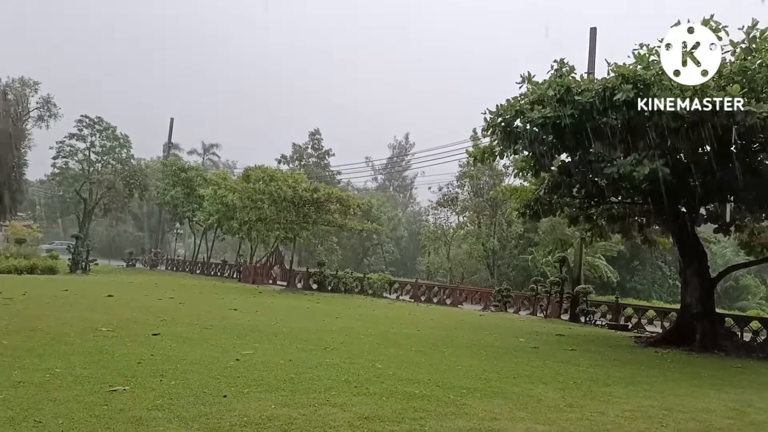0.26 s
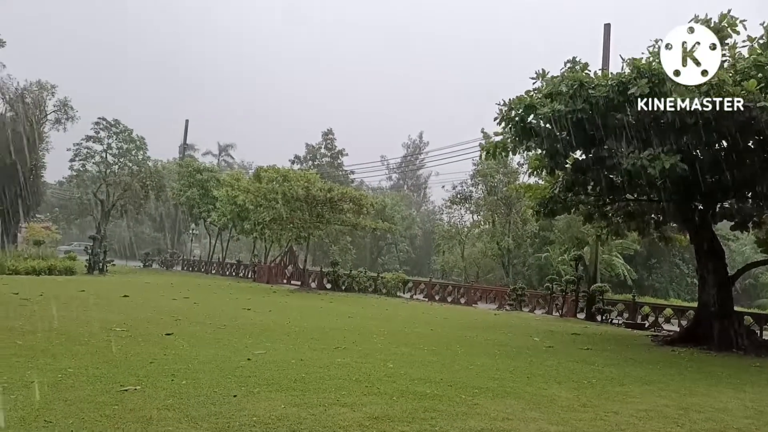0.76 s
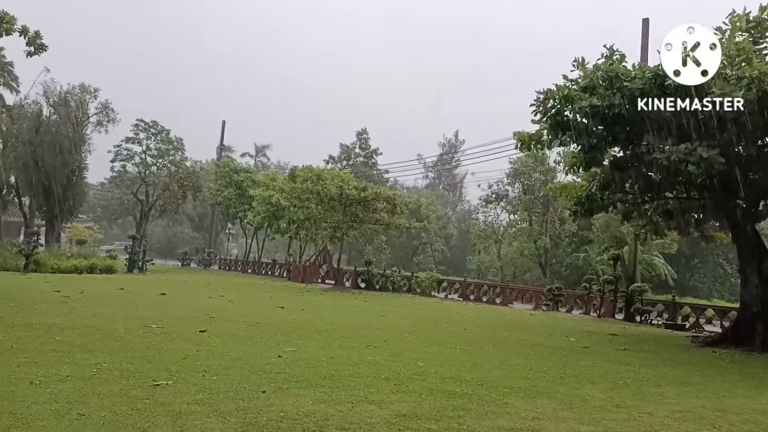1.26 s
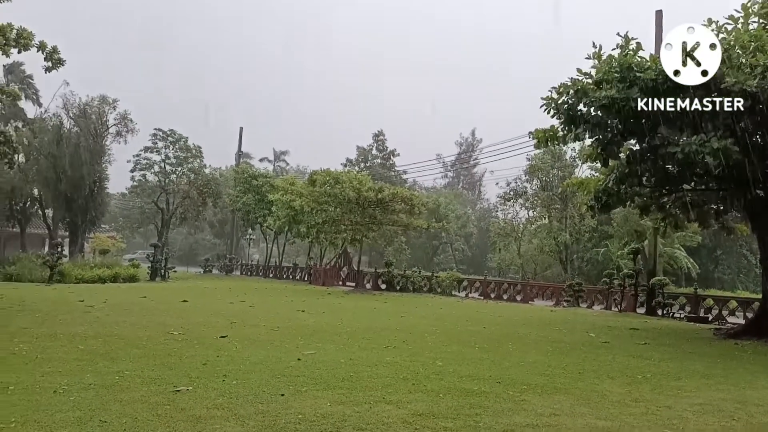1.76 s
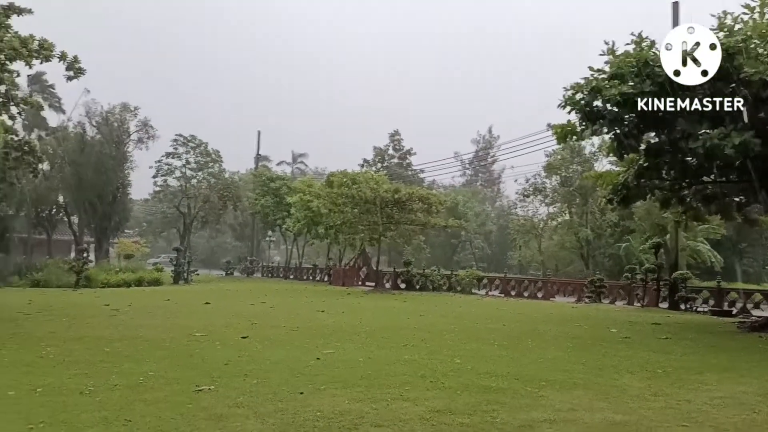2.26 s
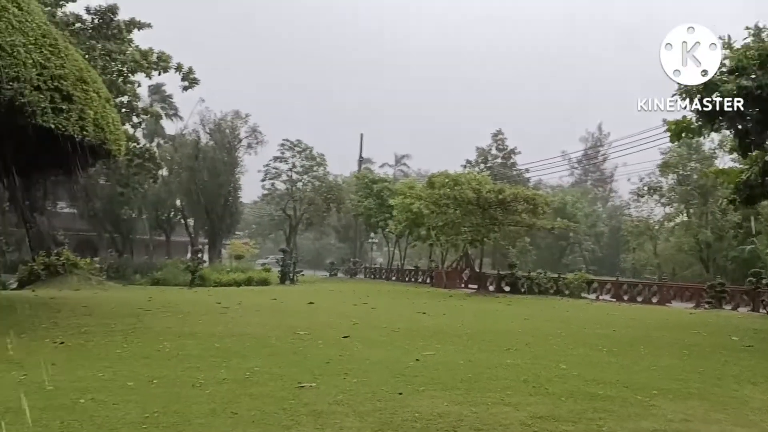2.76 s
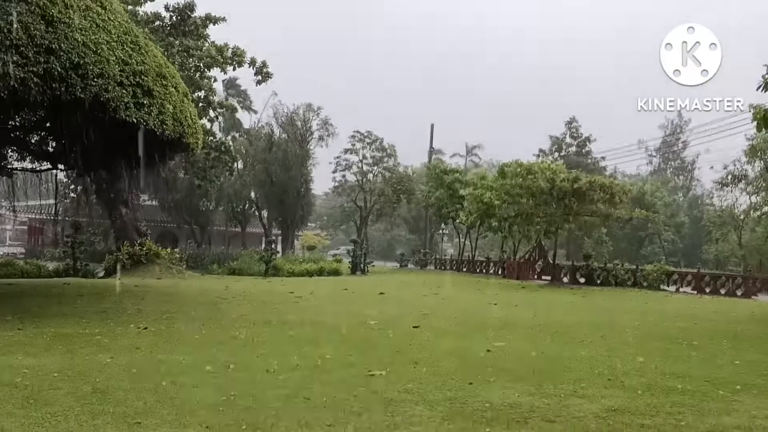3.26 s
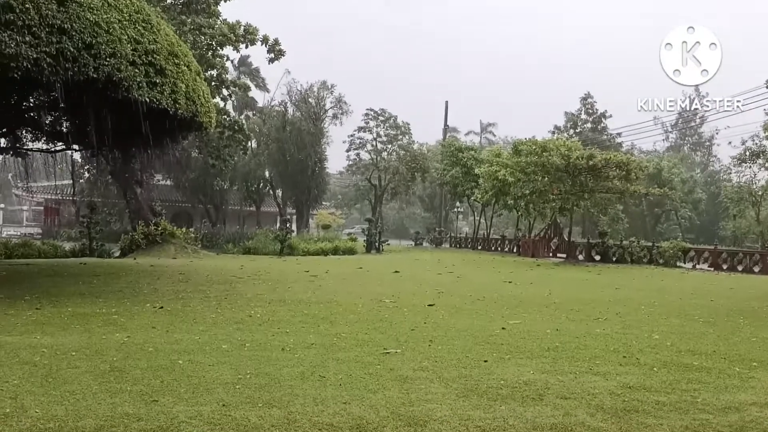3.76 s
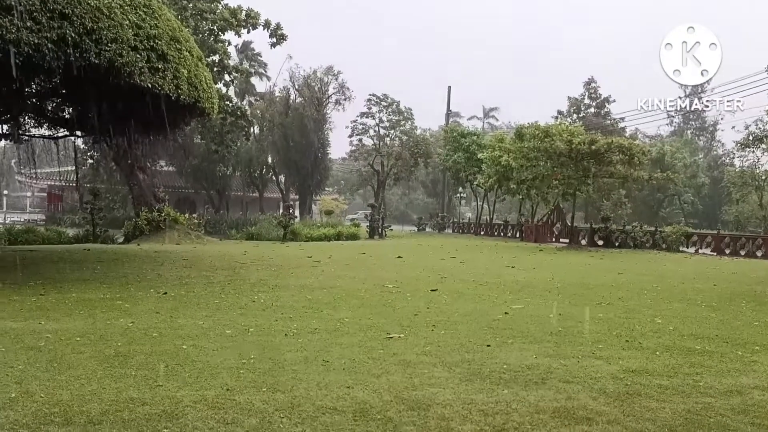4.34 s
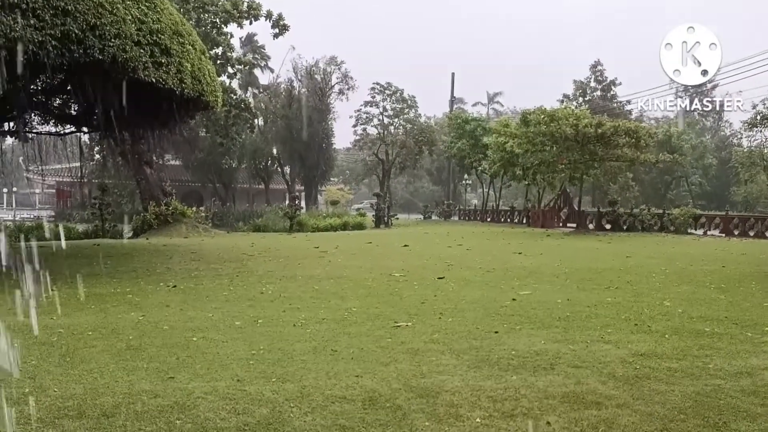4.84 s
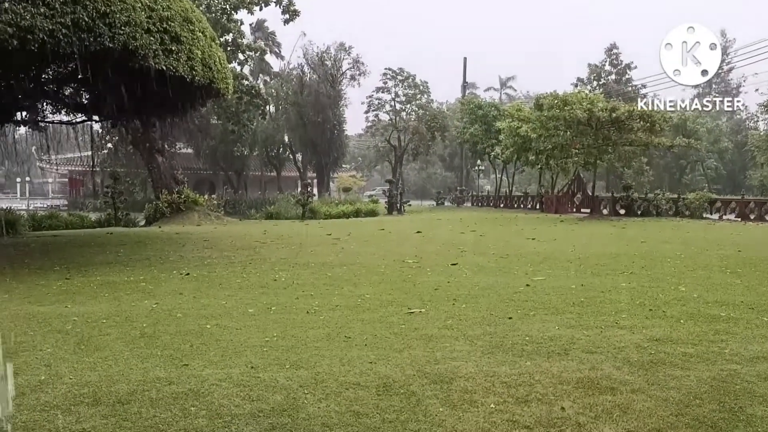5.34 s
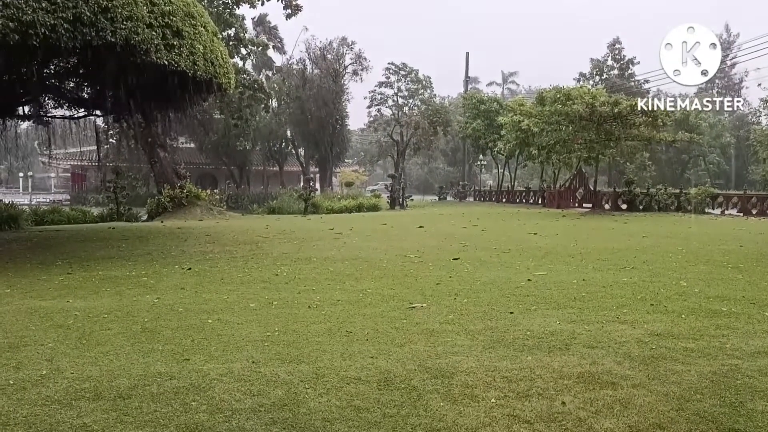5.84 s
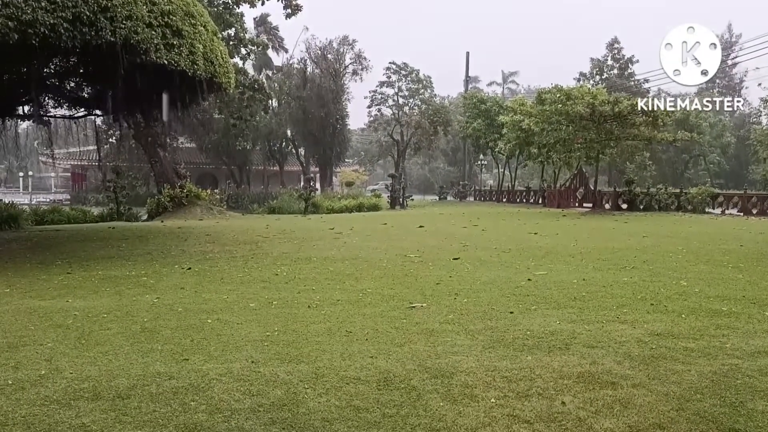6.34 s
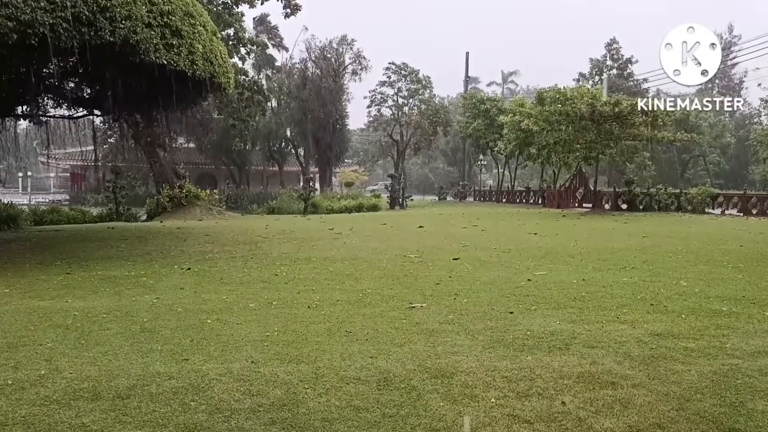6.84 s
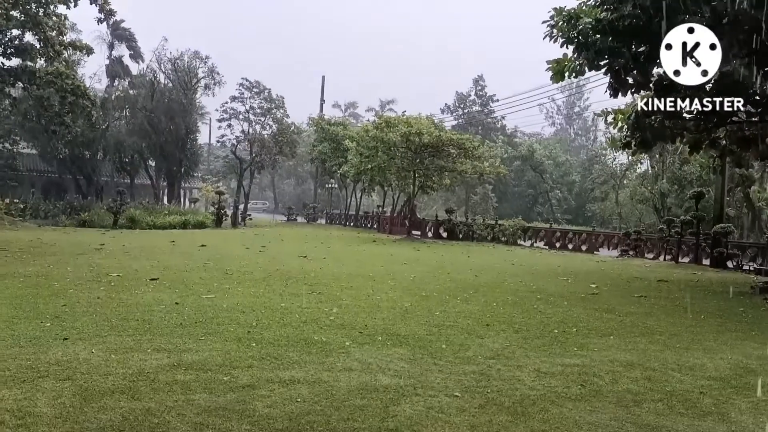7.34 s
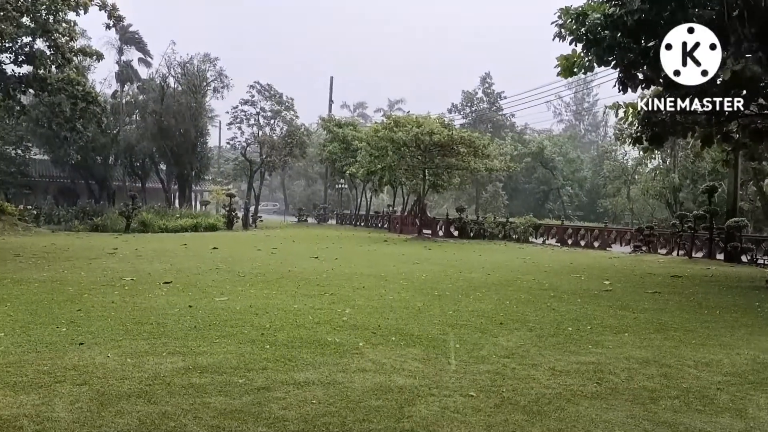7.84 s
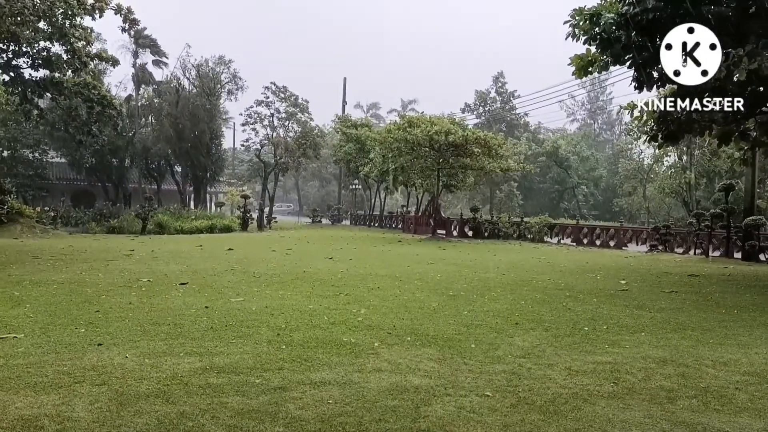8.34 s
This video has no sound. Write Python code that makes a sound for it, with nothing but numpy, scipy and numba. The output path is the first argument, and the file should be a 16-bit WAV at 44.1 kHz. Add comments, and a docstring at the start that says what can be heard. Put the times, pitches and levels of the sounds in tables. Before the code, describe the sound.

Heavy rain pours steadily on a lawn and leafy trees, a dense bright hiss with crisp close drops ticking and a few faint low thumps.

```python
"""Heavy rain on lawn and trees

A downpour on a lawn and tree crowns, taken with a hand-held phone that has two microphone ports.
Far rain is noise partly shared by the ports, thickened by thousands of small decaying rings.
Near drops are louder rings with bright noise spray and quick echoes. The low edge of the hiss opens
and closes band by band, and short narrow noise bursts fill in there; behind it lie a dark noise
floor, a wavering hum, and a few soft thumps made from rough low tones, mostly at one port.
"""
import sys
import numpy as np
from scipy import signal
from scipy.fft import rfft, irfft, next_fast_len
from scipy.io import wavfile
from scipy.ndimage import uniform_filter1d, map_coordinates
from numba import njit

SR = 44100
rng = np.random.default_rng(int(sys.argv[2]) if len(sys.argv) > 2 else 0)


def materialize(psi):
    """Save the field psi as 16-bit PCM at rate SR to the path in sys.argv[1].

    A 1-D psi becomes a single channel; in a 2-D psi each row is a channel.
    """
    bounded = np.clip(np.atleast_2d(psi).T, -1, 1)
    quanta = np.round(bounded * 32767).astype(np.int16)
    wavfile.write(sys.argv[1], SR, quanta)


N = 380583
T = np.arange(N) / SR
SIZE = next_fast_len(N)
HZ = np.arange(SIZE // 2 + 1) * SR / SIZE

# Course of the downpour: t/s, body 1.7-4 kHz level/dB, treble above 4 kHz against the body/dB
SURGE = [(0, -51, 6), (.65, -49.5, 5), (1.6, -52.5, 7.5), (2.25, -49.5, 5), (3.0, -52.5, 8.5),
         (3.7, -49.5, 4), (4.4, -49, 5.5), (5.3, -49.5, 5), (6.0, -50, 5), (6.9, -48, 3.5), (7.3, -51, 3.5),
         (7.5, -47.5, 3), (7.75, -46.5, 2), (8.12, -50.5, 6), (8.3, -49, 4.5), (8.63, -47, 3.5)]
# Flurries of drops close by, and lulls (negative): t/s, length/s, body lift/dB, treble lift/dB
FLURRIES = [(0.21, 0.052, -3, -0.5), (0.27, 0.042, 1.5, 1.5), (0.573, 0.072, -0.5, 2),
            (0.723, 0.028, -1, -2), (0.796, 0.026, 4.0, -0.5), (0.933, 0.036, -3.5, -3),
            (1.103, 0.066, 1.5, 1.5), (1.408, 0.03, 1.5, -3), (1.458, 0.034, 3, 0),
            (1.648, 0.056, -3.0, -2.0), (1.707, 0.032, -0.5, 2.0), (1.802, 0.026, 5, 1),
            (1.849, 0.06, -2, -3.5), (1.988, 0.024, -3.5, -3), (2.05, 0.025, -4, -1.5),
            (2.204, 0.056, 3, 0.5), (2.383, 0.033, -2, -4.5), (2.655, 0.027, 3, 1), (2.887, 0.011, 9.5, 5),
            (2.952, 0.022, 5, 0.5), (3.116, 0.036, -3.5, -1.0), (3.3, 0.029, -3, -1), (3.675, 0.06, 4.0, 3),
            (3.89, 0.035, 1, 2.5), (4.015, 0.03, -2, -3.5), (4.464, 0.042, 0, -4), (4.71, 0.032, -3, -1.5),
            (4.756, 0.025, -1, 1), (4.794, 0.032, -4, -0.5), (4.838, 0.053, 0, 2), (4.939, 0.028, 2, 3),
            (5.074, 0.026, 3.5, 4.5), (5.11, 0.036, -2.5, -1), (5.322, 0.054, 3.5, 2),
            (5.734, 0.051, 3.5, 2), (5.857, 0.039, 4, 3.5), (5.896, 0.057, -3.5, 0), (5.999, 0.028, 7, -1),
            (6.067, 0.027, -3.5, -3), (6.193, 0.027, 4, 1.5), (6.335, 0.047, 1.5, 4),
            (7.06, 0.11, 4.5, 2.5), (7.161, 0.025, -3, -1), (7.214, 0.022, 0, -0.5), (7.245, 0.064, 5, 4),
            (7.318, 0.024, -4, 0), (7.4, 0.034, 3, 2), (7.444, 0.06, -3.5, -3), (7.517, 0.029, -7, -2.5),
            (7.594, 0.04, -4, -3.0), (7.693, 0.098, 1.5, 1.5), (7.804, 0.047, -3, -1.5),
            (8.084, 0.094, -2, -4), (8.21, 0.043, 3.5, 1), (8.267, 0.073, -1.5, -3.5)]
# Low edge of the hiss, above which it is open: t/s, f/Hz
EDGE = [(0.0, 1190), (0.41, 1500), (0.56, 815), (0.67, 1160), (0.88, 990), (1.33, 1230), (1.43, 1090),
        (1.74, 1590), (2.22, 990), (2.55, 1380), (3.03, 1480), (4.16, 700), (4.24, 990), (4.31, 700),
        (4.4, 720), (4.46, 970), (4.55, 690), (4.67, 870), (4.87, 706), (5.74, 790), (5.96, 1430),
        (6.31, 715), (6.59, 1000), (6.95, 630), (6.975, 1010), (7.05, 1240), (7.19, 1140), (7.41, 940),
        (7.52, 1080), (7.75, 760), (8.0, 850), (8.13, 1280), (8.23, 870), (8.32, 964), (8.62, 815)]
# Bands at the low edge: low f/Hz, high f/Hz
EDGE_BANDS = [(560, 770), (770, 1040), (1090, 1300), (1300, 1700)]
# How each of these bands closes as the edge climbs:
# open level/dB, shut level/dB, half-shut edge f/Hz, softness/octaves
EDGE_GATES = [(-71, -90, 840, 0.57), (-68, -86, 940, 0.41), (-57.5, -87, 1320, 0.36),
              (-53.5, -71, 1210, 0.7)]
# Colour that each microphone port gives the rain: f/Hz, left gain/dB, right gain/dB
PORT_COLOUR = [(654, -4, -4), (1320, 3, -4.5), (2470, 2.5, -1.5), (2880, -0.5, 3), (4640, -7.5, -6),
               (5620, -4, -3.5), (6700, -8.5, -5), (8010, -14, 0), (9060, -9.5, -14), (10460, 0.5, -17),
               (11250, -5.5, -6.5), (12600, -5.5, -17), (15200, 0, -4), (16600, -2.5, -6)]
# Share of far-rain power common to both ports: f/Hz, likeness/0-1
RAIN_LIKENESS = [(700, 0.3), (1500, 0.95), (2300, 0.22), (3500, 0.2), (7000, 0.1), (10000, 0.1)]
# Arrival at the left port after the right one: t/s, lag/ms
PORT_LAG = [(0, 0.21), (3.5, 0.2), (6.955, 0.18), (6.975, 0.44), (8.63, 0.46)]
# Loudest near drops: t/s, ring level before its rise/dB, ring f/Hz,
# spray level before smoothing/dB, left minus right ring level/dB
NEAR_DROPS = [(0.038, -31, 1580, -39, 7), (0.059, -50, 2170, -43, 1), (0.15, -57, 6070, -48, -4),
              (0.188, -35, 2670, -42, 1), (0.267, -41, 5170, -50, -22), (0.354, -46, 8230, -49, -1.5),
              (0.378, -35, 2650, -50, -1.0), (0.406, -47, 2010, -42, 4), (0.555, -27, 2000, -55, 4),
              (0.613, -23, 3460, -35, -9), (0.648, -38, 2200, -52, 1), (0.673, -50, 2720, -55, -2.0),
              (0.688, -50, 3850, -51, -1.5), (0.755, -42, 2100, -37, -1.0), (0.802, -27, 3020, -37.5, -8),
              (0.881, -18, 7000, -36, -7), (0.922, -26, 2370, -44, 16), (1.039, -32, 1920, -44, 10),
              (1.093, -26, 2510, -45, -1.0), (1.11, -28, 5600, -48, 0), (1.116, -20, 6000, -39.5, 1),
              (1.156, -24, 5580, -43, 1), (1.196, -37, 1340, -46, 6), (1.245, -42, 2240, -54, -1.0),
              (1.308, -39, 2810, -39, -2), (1.353, -25.5, 2780, -45, -1.0), (1.408, -30.5, 1520, -39, 6),
              (1.472, -27, 2780, -33.5, -7), (1.493, -26, 5000, -41, -14), (1.528, -27, 7630, -36, -16),
              (1.703, -34, 5950, -40, -7), (1.806, -26.5, 2700, -38, -1), (1.901, -46, 7800, -38.5, -2.5),
              (1.942, -45, 2940, -42, -2.0), (1.97, -40, 5600, -39, -2.0), (2.158, -33, 1960, -41, 10),
              (2.194, -40, 1320, -40, -0.5), (2.226, -27, 2550, -50, -3), (2.319, -34, 1750, -40, 5),
              (2.409, -46, 5640, -37.5, -8), (2.434, -25, 3800, -44, -4), (2.461, -35, 2360, -42, 0.0),
              (2.502, -30, 5450, -39, -2.0), (2.554, -39, 2700, -39, -1.0), (2.648, -29, 7290, -37, -2.5),
              (2.762, -28, 3150, -36, -2.0), (2.887, -37, 2900, -44, -5), (3.172, -42, 2790, -41, -1.5),
              (3.252, -47, 2840, -48, -1.5), (3.272, -23, 5310, -40, 7), (3.333, -35, 3300, -41, -1.5),
              (3.397, -36, 1810, -52, 3), (3.422, -27, 5160, -37.5, 1), (3.465, -31, 2200, -38, 9),
              (3.542, -56, 1650, -60, 0.0), (3.71, -23, 2610, -49, 3), (3.769, -48, 1290, -41, -0.5),
              (3.999, -51, 1240, -54, 5), (4.033, -48, 1350, -58, 0.5), (4.052, -27, 2870, -39, -2),
              (4.059, -29, 10300, -51, 3), (4.083, -29, 2670, -42, -1.0), (4.116, -38, 1730, -50, 3.5),
              (4.131, -36, 1660, -48, 6), (4.233, -24, 5850, -35.5, 10), (4.266, -30, 2460, -37, 0.5),
              (4.326, -24, 1580, -40, 4), (4.363, -34, 1300, -39.5, 5.5), (4.402, -26, 2320, -42, 8),
              (4.516, -27.5, 1630, -43, 7), (4.573, -33, 1120, -56, 0.5), (4.613, -26, 8000, -52, 1.5),
              (4.757, -19.5, 3560, -36, -9), (4.838, -31, 1300, -35.5, 5), (4.943, -24, 6140, -37, 1),
              (5.017, -43, 1340, -39.5, 2), (5.075, -43, 1370, -39, -5), (5.132, -52, 1620, -39, -1.5),
              (5.226, -30, 1260, -42, 0), (5.245, -30, 1520, -46, 9), (5.354, -26, 2290, -33, 1),
              (5.397, -37, 1360, -37, 6), (5.606, -31, 1640, -57, 6), (5.69, -25, 5530, -46, 0.0),
              (5.834, -31, 2750, -37, -0.5), (5.865, -36, 2720, -48, -1.5), (5.882, -28, 3160, -38, -2),
              (5.948, -55, 1740, -41.5, -0.5), (5.974, -37, 3710, -46, -2.0), (6.003, -38, 2700, -40, -6),
              (6.053, -54, 5780, -50, -1.5), (6.098, -36, 2990, -42, -0.5), (6.17, -28, 4970, -40, -0.5),
              (6.207, -38, 1610, -49, 7), (6.245, -37, 2050, -48, 1.5), (6.27, -36, 1670, -54, 8),
              (6.324, -39, 1630, -44, 0.5), (6.4, -33, 2920, -40, 6), (6.491, -31, 1630, -43, 5),
              (6.639, -40, 2610, -56, 0.0), (6.701, -40, 1650, -50, 5), (6.798, -33, 2220, -60, 1.0),
              (6.828, -43, 2420, -45, 1.5), (6.851, -25.5, 916, -56, 5), (6.852, -28, 1250, -56, 0),
              (6.904, -28, 2110, -45, 3), (6.866, -32, 1330, -55, 3), (6.949, -27, 1090, -54, -3),
              (7.013, -26.5, 2630, -54, 8), (7.258, -29, 2170, -39.5, -8), (7.292, -28, 2080, -49, 6),
              (7.346, -49, 1950, -62, 3), (7.411, -34, 2870, -46, 4), (7.426, -27, 2200, -50, -4),
              (7.55, -31, 2130, -46, 7), (7.665, -30, 2260, -36, 5), (7.729, -20, 2510, -43, 14),
              (7.754, -39, 2150, -47, -2), (8.029, -25, 2180, -45, 2), (8.214, -27, 2440, -43, 0.0),
              (8.265, -28, 2310, -55, 9), (8.374, -32, 2100, -51, -3), (8.533, -27, 4420, -38, -7),
              (8.572, -35, 2240, -51, 1.0), (6.947, -29, 1720, -50, 2), (6.835, -33, 1800, -52, 3),
              (0.059, -28.0, 5770.0, -56, -1.0), (0.151, -24, 11070, -55.0, 8.0),
              (0.192, -28, 2670.0, -55.0, -1.0), (0.51, -33, 1420, -53, 7.0),
              (0.579, -29.0, 5730.0, -55.0, -2.0), (0.602, -29.0, 5920.0, -55.0, -3.0),
              (0.607, -24, 10530.0, -55.0, 10), (0.689, -26, 6500.0, -55.0, -4.0),
              (0.77, -30, 2780.0, -49, -2.0), (0.781, -29.0, 10360.0, -48, 7.0),
              (0.809, -36, 1830.0, -55.0, 9.0), (0.848, -31, 1740.0, -55.0, 5.0),
              (0.921, -30.0, 4240.0, -55.0, -1.0), (1.638, -35, 1900, -55.0, 4),
              (1.821, -36, 3040.0, -55.0, 0.0), (2.204, -36, 1420.0, -55.0, 5),
              (2.243, -23, 5040.0, -55.0, 2), (2.438, -46, 1440.0, -55.0, 3.0),
              (2.462, -38, 1870.0, -55.0, 5.0), (2.668, -28, 7690.0, -51, -4.0),
              (3.172, -28, 2860.0, -55.0, -2.0), (3.953, -42, 1600, -57, 8.0),
              (4.033, -30.0, 5080.0, -55.0, -1.0), (4.061, -20, 10200, -55.0, 14),
              (4.212, -33, 1430, -50, 6.0), (4.266, -23, 5400, -48, 0.0), (4.45, -33, 1280, -55.0, 2),
              (4.518, -30.0, 2130.0, -55.0, 0.0), (4.77, -32, 1310.0, -53, 6),
              (4.859, -24, 3660.0, -52, -2), (4.913, -32, 1310, -41, 3.0), (4.919, -22, 10060.0, -51, 14),
              (4.953, -26, 3060, -55.0, 0.0), (4.961, -23, 6120.0, -55.0, 0.0),
              (5.26, -22, 6180.0, -53, -3.0), (5.355, -20, 6160, -57, -2.0), (5.368, -33, 1400.0, -57, 2.0),
              (5.575, -37, 1360.0, -57, 2), (5.585, -35, 1280, -59, -1), (5.732, -30, 5750.0, -55.0, 0.0),
              (5.885, -34, 1700.0, -55.0, 16), (5.89, -33, 3080.0, -55.0, -2.0),
              (5.95, -36, 1640, -55.0, 11), (5.975, -28.0, 3770.0, -55.0, -4.0),
              (6.021, -40, 1720, -57, 6.0), (6.152, -38, 1550.0, -55.0, 7.0),
              (6.225, -44, 1440.0, -55.0, 2), (6.245, -34, 1980.0, -55.0, 7.0),
              (6.273, -35, 1720.0, -55.0, 9.0), (6.355, -27, 5120.0, -55.0, -4.0),
              (6.422, -27, 6030.0, -46, -3.0), (6.586, -33, 5250.0, -55.0, -2.0),
              (6.64, -29, 2390.0, -57, -1.0), (6.701, -34, 1740.0, -55.0, 8.0),
              (6.799, -42, 1340.0, -59, 4), (6.828, -24, 10270.0, -55.0, 15),
              (7.132, -29, 1830, -55.0, 7.0), (7.251, -26, 10770.0, -55.0, 11.0),
              (7.282, -30, 2260.0, -55.0, -3), (7.36, -32, 2300.0, -55.0, 10),
              (7.558, -31, 1870.0, -55.0, 7.0), (7.753, -28, 2350.0, -55.0, 9),
              (7.761, -30, 4010.0, -55.0, -3.0), (7.772, -24, 5470.0, -55.0, -9.0),
              (7.79, -28.5, 1800, -55.0, -2), (7.85, -30, 1750, -55.0, 4.0),
              (7.934, -28.5, 1960.0, -53, 5.0), (7.949, -27, 10700, -53, 7.0),
              (7.973, -35, 1700.0, -55.0, -6), (7.981, -27, 10400.0, -55.0, 6.0),
              (8.265, -36, 1890, -57, 1), (8.297, -37, 1830.0, -55.0, 4), (8.374, -28, 4820.0, -55.0, -4.0),
              (8.407, -30, 1790, -57, 4.0), (8.533, -24.5, 6050.0, -53, -4), (8.534, -28, 1780, -46, 7),
              (8.585, -32, 1780, -55.0, 6)]
# Returns of a drop from nearby surfaces: delay/ms, level/dB
ECHOES = [(2.6, -24.5), (4.8, -10.5), (8.0, -8.5)]
# Short openings of the hiss near its low edge: t/s, length/s, level before the fade/dB,
# centre f/Hz, left minus right level/dB
EDGE_BURSTS = [(0.19, 0.06, -62.5, 1000, 7), (0.518, 0.075, -54, 1010, 7), (1.2, 0.057, -63, 1010, 7),
               (1.43, 0.045, -62, 1020, 7), (4.575, 0.019, -49, 900, 4), (4.645, 0.03, -57, 920, 5),
               (0.721, 0.235, -63.5, 930, 16), (5.385, 0.068, -61, 820, 15),
               (7.378, 0.056, -62, 1060, 13.5), (7.68, 0.14, -61.5, 980, -1.5),
               (7.847, 0.068, -62, 920, 12), (8.019, 0.045, -66, 1030, 13), (8.184, 0.031, -64, 1030, 13),
               (8.228, 0.042, -59, 1070, 17), (8.352, 0.03, -62, 1020, 8), (8.41, 0.034, -55, 980, 5),
               (8.498, 0.036, -62, 972, -3), (8.568, 0.062, -60, 990, 5), (3.891, 0.057, -53, 970, 1),
               (4.005, 0.046, -55, 890, 12), (4.111, 0.08, -50.5, 890, 7), (4.298, 0.036, -50, 810, 7),
               (4.354, 0.079, -56, 871, 7.5), (4.506, 0.13, -54.5, 900, 5), (4.707, 0.056, -54.5, 980, 8),
               (4.823, 0.12, -51.5, 910, 12), (4.951, 0.05, -53, 880, 11), (5.011, 0.074, -56.5, 990, 5.5),
               (5.072, 0.037, -56, 1000, -2), (5.164, 0.036, -52, 992, 4), (5.208, 0.032, -65, 907, 0.0),
               (5.238, 0.062, -54, 920, 7), (5.294, 0.056, -56, 857, 14), (5.545, 0.05, -51, 905, 0.0),
               (5.659, 0.03, -51.5, 930, 3.0), (6.291, 0.19, -56, 875, 7), (6.466, 0.082, -54.5, 1030, 2),
               (6.754, 0.054, -50.5, 805, 9), (6.841, 0.091, -49.5, 910, 2), (6.933, 0.046, -46, 1080, 5),
               (0.019, 0.043, -53, 1550, 2), (0.526, 0.063, -50, 1410, 9), (0.759, 0.055, -53, 1520, 6.0),
               (0.819, 0.049, -52, 1440, 6.0), (0.869, 0.07, -48, 1470, 5.0),
               (0.999, 0.027, -59, 1520, 9.5), (1.188, 0.053, -52.5, 1340, 8.5),
               (1.4, 0.032, -49, 1450, 10), (1.45, 0.034, -48, 1560, 7), (2.082, 0.038, -60, 1420, 4),
               (2.156, 0.14, -54, 1390, -2), (2.294, 0.097, -55, 1510, 1), (2.427, 0.046, -46.5, 1420, 2),
               (3.347, 0.026, -51, 1560, 11), (3.391, 0.052, -54, 1670, 7.0),
               (3.485, 0.054, -50, 1310, 9.5), (3.613, 0.028, -53, 1300, 3), (3.661, 0.1, -51, 1400, 1),
               (3.76, 0.032, -56, 1310, -1), (3.873, 0.054, -45.5, 1370, 5.5), (4.12, 0.048, -46, 1570, 5),
               (4.186, 0.085, -48, 1430, 3), (4.316, 0.024, -46, 1500, 8), (4.352, 0.035, -49, 1330, 3),
               (4.57, 0.019, -49, 1450, 4), (4.751, 0.025, -44, 1340, 5.5), (4.831, 0.041, -46, 1390, 5.0),
               (4.899, 0.029, -48, 1350, 3), (5.017, 0.036, -44, 1330, 3.0), (5.078, 0.04, -45, 1460, 3),
               (5.218, 0.035, -45, 1470, 9), (5.276, 0.058, -45, 1510, 0), (5.741, 0.027, -40, 1300, 4),
               (6.192, 0.028, -41, 1560, 7.0), (6.268, 0.041, -53, 1420, 4), (6.318, 0.036, -47, 1410, -3),
               (6.669, 0.048, -45, 1290, 5.0), (6.753, 0.028, -43, 1510, 5),
               (6.83, 0.088, -49.5, 1470, 4.0), (6.932, 0.028, -56, 1360, 3.5)]
# Soft thumps: t/s, nominal peak level/dB, starting f/Hz, left minus right level/dB,
# length (at least 0.01 is played)/s, pitch fall/share, roughness/ratio
THUMPS = [(0.915, -61, 160, -18, 0.0083, .2, 1.1), (1.083, -55.5, 149, -31, 0.1, 0.24, 1.4),
          (2.977, -67, 114, 17, 0.052, 0.23, 1), (3.971, -54.5, 130, -27, 0.08, 0.66, 0.47),
          (4.433, -57, 108, -26, 0.051, 0.35, 0.92), (6.822, -66, 348, -11, 0.1, .05, .5),
          (7.402, -68, 75, -5, 0.059, .2, 1), (7.764, -60, 100, -4, 0.045, 0.18, 0.93),
          (7.84, -71, 130, -3, .04, .1, 1.5), (8.2, -70, 90, 0, .04, .1, 1.2),
          (8.233, -58.5, 130, 4, 0.047, .2, 1.8)]
# Brief low click: t/s, peak level/dB, f/Hz, left minus right level/dB, length/s
CLICKS = [(6.965, -49, 322, 9, 0.0025)]
# Spectrum of the dark floor: f/Hz, relative level/dB
FLOOR_COLOUR = [(18, -35), (30, 0), (49, -7.5), (119, -6), (170, -6.5), (235, -11.5), (329, -12.5),
                (455, -12), (600, -12.5), (780, -30), (1320, -120)]
# Loudness of the dark floor: t/s, level/dB
FLOOR_LEVEL = [(0, -78), (3.75, -78), (4.3, -75), (5.2, -77), (7.5, -76.5), (8.63, -74.5)]
# Share of floor power common to both ports: f/Hz, likeness/0-1
FLOOR_LIKENESS = [(30, 0.4), (100, 0.88), (300, 0.77), (600, 0.7)]
# Loudness of the hum: t/s, level/dB
HUM_LEVEL = [(3.75, -98), (3.92, -79), (4.2, -85), (4.6, -95), (4.75, -91), (4.93, -74), (5.04, -85),
             (5.22, -78), (5.55, -85), (5.63, -101), (5.73, -76), (5.95, -82), (6.05, -83), (6.2, -78),
             (6.35, -84), (6.55, -80), (6.8, -80), (7.05, -99)]

GUST_DB, TREBLE_SHARE = 0.32, 0.076  # scale of random body surges; share the treble follows
DIP_DB, DIP_S = -0.5, 0.006  # dip of the body at a near drop; half length of the bump
DIP_PULL_OCT = 0.071  # the edge sinks with the same bump
EDGE_JITTER_OCT, BAND_JITTER_OCT = 0.16, 0.071  # wander of the whole edge, and of each band's own
EDGE_SHARE = 0.33  # how far the edge bands follow flurries and random surges
SINK_OCT_PER_DB = 0.01  # the edge sinks in a flurry and climbs in a lull
FLURRY_RAMP_S = 0.0059
DROP_RISE = 0.47  # time constant of a ring's rise, in cycles
SPRAY_RISE_S, SPRAY_DECAY_S, SPRAY_TILT_DB_OCT = 0.0032, 0.0086, -1.5
BURST_WIDTH, BURST_LOW_HZ = 0.27, 727  # bandwidth as a share of the centre; low cut
BURST_RAMP_S, BURST_FADE_DB = 0.0053, -4.5  # the fade starts at this gain and ends at twice it in dB
THUMP_LOW_HZ, THUMP_GRAIN = 40, 0.77  # low cut; cycles over which the roughness is smoothed
HUM_HZ, HUM_WAVER_HZ, HUM_WAVER_DB = 115, 0.6, 1.5
TOP_HZ = 15500


def rain():
    """Far hiss and patter through the ports, with body, treble and edge bands flickering apart."""
    wet = shape(hiss() + undb(-9.5) * patter(), undb(over_hz(PORT_COLOUR)))
    body_db, treble_db = curves(SURGE)
    quick, near = walk(30), near_drop_bumps()
    body_lift_db, treble_lift_db = flurries()
    gust_db = GUST_DB * walk(13) + DIP_DB * near

    body = unit(band(wet, 1666, 4050, skirt_hz=97))
    out = undb(body_db + body_lift_db + gust_db + 0.18 * quick) * body

    treble_bands = ((4000, 6500), (6500, 9000), (9000, 12500), (12500, 20000))
    treble = sum(undb(0.85 * walk(24)) * band(wet, lo, hi, skirt_hz=275) for lo, hi in treble_bands)
    treble_level_db = body_db + treble_db + treble_lift_db + TREBLE_SHARE * gust_db + 0.47 * quick
    out += undb(treble_level_db) * unit(treble)

    edge_oct = np.log2(curves(EDGE)[0]) + EDGE_JITTER_OCT * walk(14)
    edge_oct = edge_oct - DIP_PULL_OCT * near - SINK_OCT_PER_DB * body_lift_db
    edge_lift_db = EDGE_SHARE * (body_lift_db + gust_db) + 1.5 * walk(16)
    for (lo, hi), (open_db, shut_db, half_hz, octaves) in zip(EDGE_BANDS, EDGE_GATES):
        above_oct = edge_oct + BAND_JITTER_OCT * walk(12) - np.log2(half_hz)
        shut = (1 + np.tanh(above_oct / octaves)) / 2
        level_db = open_db + (shut_db - open_db) * shut + edge_lift_db
        out += undb(level_db) * patchy(wet, lo, hi, 4.0, 22)
    return out


def hiss():
    """Far rain as noise: part arrives from one side with a lag between ports, the rest is diffuse."""
    common, own = rng.standard_normal(N), rng.standard_normal((2, N))
    left_position = np.arange(N) - curves(PORT_LAG)[0] * SR / 1000
    late = map_coordinates(common, [left_position], order=3, mode="mirror")
    like = np.clip(over_hz(RAIN_LIKENESS)[0], 0, 1)
    return shape(np.array([late, common]), np.sqrt(like)) + shape(own, np.sqrt(1 - like))


def patter(count=16000):
    """Drops on leaves and blades all around: many small, few large, pitch spread evenly in octaves."""
    when, pitch, strength, ringing, side, direction = rng.random((count, 6)).T
    s = when * N / SR
    hz = 700 * (15000 / 700) ** pitch
    db = np.minimum(-4.0 * np.log(1 - strength), 12) + 4.2 * np.log2(hz / 3000)
    lag_ms = np.interp(s, *np.transpose(PORT_LAG)) - .22 * direction ** 2
    return unit(ticks(s, hz, 2.0 + 5.5 * ringing, db, 14 * (side - .5), lag_ms))


def flurries():
    """Flurries and lulls shift the body and treble levels: a quick ramp, a hold, a quick ramp back."""
    out = np.zeros((2, N))
    for s, length, *lifts in FLURRIES:
        at = slice(int((s - FLURRY_RAMP_S) * SR), int((s + length + FLURRY_RAMP_S) * SR))
        inside_s = np.minimum(T[at] - s, s + length - T[at])
        gate = np.clip(inside_s / FLURRY_RAMP_S + .5, 0, 1)
        out[:, at] += gate * np.array(lifts)[:, None]
    return out


def near_drop_bumps():
    """A smooth bump around each near drop that grows slowly with its strength and saturates at 1."""
    s, db = np.transpose(NEAR_DROPS)[:2]
    hits = np.zeros(N)
    hits[(s * SR).astype(int)] = undb((db + 26) / 2)
    bump = np.hanning(int(2 * DIP_S * SR))
    return np.tanh(signal.fftconvolve(hits, bump, mode="same"))


def near_drops():
    """Single large drops, nearly level in arrival: a decaying ring and a bright noise spray."""
    s, db, hz, spray_db, pan_db = np.transpose(NEAR_DROPS)
    ring = ticks(s, hz, np.full(len(s), 6.0), db, pan_db, np.full(len(s), .03))

    hits = np.zeros(N)
    hits[(s * SR).astype(int)] = undb(spray_db)
    fading = signal.lfilter([1], [1, -np.exp(-1 / (SPRAY_DECAY_S * SR))], hits)
    fading = uniform_filter1d(fading, int(SPRAY_RISE_S * SR))
    fine = band(rng.standard_normal((2, N)), 2370, 24700, skirt_hz=704)
    colour_db = over_hz(PORT_COLOUR) + SPRAY_TILT_DB_OCT * np.log2(1 + HZ / 6000)
    spray = fading * unit(shape(fine, undb(colour_db)))
    return band(ring, 770, 20000) + band(spray, 1500, 20000, skirt_hz=200)


def ticks(s, hz, cycles, db, pan_db, lag_ms):
    """Rings at both ports, the left one late by lag_ms, each followed by its echoes."""
    left_late, right_late = np.maximum(lag_ms, 0) / 1000, np.maximum(-lag_ms, 0) / 1000
    ports = []
    for late, side in ((left_late, 1), (right_late, -1)):
        start = ((s + late) * SR).astype(np.int64)
        size = undb(db + side * pan_db / 2)
        ports.append(grains(start, hz, cycles, size, DROP_RISE, N, float(SR)))
    direct = np.array(ports)
    echoes = sum(undb(echo_db) * np.roll(direct, int(ms * SR / 1000), axis=1) for ms, echo_db in ECHOES)
    return direct + echoes


@njit
def grains(start, hz, cycles, size, rise, n, sr):
    """Damped sines with a soft rise, stopped after twice their cycles, about 50 dB down."""
    out = np.zeros(n)
    for k in range(len(start)):
        turn = np.exp(complex(-3 * hz[k] / cycles[k] / sr, 2 * np.pi * hz[k] / sr))
        opening, shut = np.exp(-hz[k] / rise / sr), 1.
        z = complex(size[k], 0.)
        for i in range(start[k], min(n, start[k] + int(2 * cycles[k] * sr / hz[k]))):
            out[i] += z.imag * (1 - shut) ** 2
            z *= turn
            shut *= opening
    return out


def edge_bursts():
    """Narrow noise bursts at the low edge of the hiss: abrupt start, slight fade, abrupt end."""
    out, noise = np.zeros((2, N)), hiss()
    for s, length, db, hz, pan_db in EDGE_BURSTS:
        t = np.arange(int(length * SR)) / SR
        edges = hz * (1 + BURST_WIDTH * np.array([-.5, .5]))
        sos = signal.butter(3, edges, "bandpass", fs=SR, output="sos")
        start = int(s * SR)
        burst = signal.sosfiltfilt(sos, noise[:, start:start + 2 * len(t)])[:, :len(t)]
        gate = np.sin(np.pi / 2 * np.clip(np.minimum(t, length - t) / BURST_RAMP_S, 0, 1)) ** 2
        fade = undb(BURST_FADE_DB * (t / length + 1.0))
        add(out, s, db, pan_db, unit(burst) * gate * fade)
    return band(out, BURST_LOW_HZ, 20000)


def thumps():
    """Puffs of air on a port give a rough, sinking low tone; apart from them, a brief low click lasts most of
    one low cycle."""
    out = np.zeros((2, N))
    for s, db, hz, pan_db, length, fall, rough in THUMPS:
        t = np.arange(int(max(length, .01) * SR)) / SR
        k = int(THUMP_GRAIN * SR / min(hz, 200))
        wander = uniform_filter1d(uniform_filter1d(rng.standard_normal((2, SR // 5)), k), k)
        wander = wander[:, :len(t)] * np.sqrt(k)
        tone = np.exp(2j * np.pi * hz * t * (1 - fall * t / length / 2))
        puff = np.real((1 + rough * (wander[0] + 1j * wander[1])) * tone)
        puff = puff / np.sqrt(2 * np.mean(puff ** 2))
        add(out, s, db, pan_db, signal.windows.tukey(len(t), .7) * puff)
    out = band(out, THUMP_LOW_HZ, 2000, skirt_hz=20)
    for s, db, hz, pan_db, length in CLICKS:
        t = np.arange(int(length * SR)) / SR
        add(out, s, db, pan_db, signal.windows.tukey(len(t), .6) * np.sin(2 * np.pi * hz * t))
    return out


def floor():
    """Faint dark noise, partly alike at the ports, and a sine hum wavering in pitch and level."""
    like = np.clip(over_hz(FLOOR_LIKENESS)[0], 0, 1)
    common = shape(rng.standard_normal(N), np.sqrt(like))
    noise = common + shape(rng.standard_normal((2, N)), np.sqrt(1 - like))
    dark = patchy(shape(noise, undb(over_hz(FLOOR_COLOUR)[0])), 26, 710, 3.0, 7, count=5)
    phase = 2 * np.pi * np.cumsum(HUM_HZ + HUM_WAVER_HZ * walk(8)) / SR
    hum = np.sqrt(2) * np.sin(phase)
    dark_db = curves(FLOOR_LEVEL)[0] + 0.86 * walk(5.24)
    hum_db = curves(HUM_LEVEL)[0] + HUM_WAVER_DB * walk(7.1)
    return undb(dark_db) * dark + undb(hum_db) * hum


def patchy(x, lo_hz, hi_hz, flicker_db, rate, count=3):
    """A band whose narrow parts come and go on their own, dipping further than they rise."""
    edges = np.geomspace(lo_hz, hi_hz, count + 1)
    parts = []
    for lo, hi in zip(edges, edges[1:]):
        level = walk(rate)
        level = np.where(level > 0, np.tanh(level), level)
        parts.append(undb(flicker_db * level) * band(x, lo, hi))
    return unit(sum(parts))


def walk(rate):
    """Random levels held 1 / rate s, then slewed twice; spread about 0.74."""
    k = int(SR / rate)
    held = np.repeat(rng.standard_normal(N // k + 1), k)
    return uniform_filter1d(uniform_filter1d(held, k), k)[:N]


def add(out, s, db, pan_db, wave):
    """Mix a short sound in at its time, level and side."""
    sides = undb(np.array([[pan_db], [-pan_db]]) / 2)
    i = int(s * SR)
    out[:, i:i + wave.shape[-1]] += undb(db) * wave * sides / sides.mean()


def band(x, lo_hz, hi_hz, skirt_hz=25):
    """A steep band; neighbours with the same skirt add up flat."""
    return shape(x, (np.tanh((HZ - lo_hz) / skirt_hz) - np.tanh((HZ - hi_hz) / skirt_hz)) / 2)


def shape(x, gain):
    """Weight the spectrum by a gain for each frequency bin."""
    return irfft(rfft(x, SIZE) * gain, SIZE)[..., :N]


def over_hz(table):
    """Columns of a frequency table, one value a bin, interpolated along log frequency."""
    hz, *columns = np.transpose(table)
    return np.array([np.interp(np.log(HZ + 1), np.log(hz), c) for c in columns])


def curves(table):
    """Columns of a time table, one value a sample."""
    s, *columns = np.transpose(table)
    return [np.interp(T, s, c) for c in columns]


def unit(x):
    """Scale so that the mean of the channels has rms 1."""
    return x / np.sqrt(np.mean(np.mean(np.atleast_2d(x), axis=0) ** 2))


def undb(db):
    """Amplitude ratio of a level in dB."""
    return 10 ** (np.asarray(db) / 20)


def scene():
    """Sum at the two ports, from the downpour back to the floor."""
    return rain() + near_drops() + edge_bursts() + thumps() + floor()


def record(dry):
    """The phone cuts the top steeply."""
    return signal.sosfilt(signal.ellip(12, .2, 70, TOP_HZ, fs=SR, output="sos"), dry)


dry = scene()
out = record(dry)
materialize(out)
```